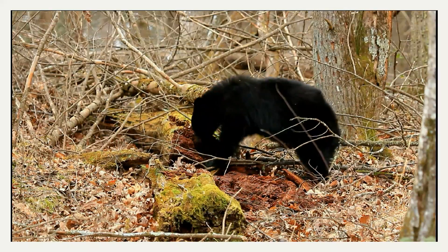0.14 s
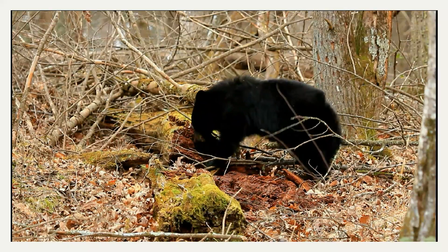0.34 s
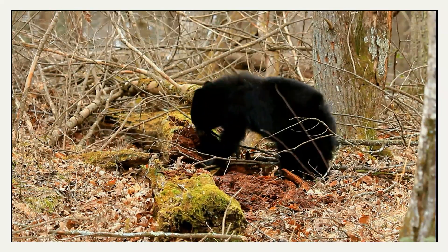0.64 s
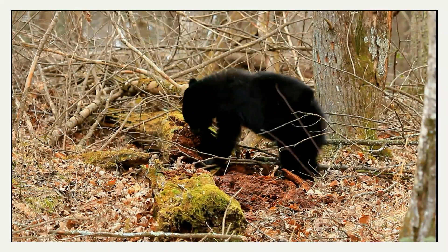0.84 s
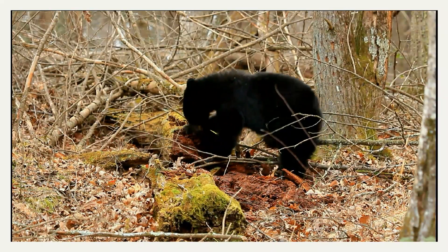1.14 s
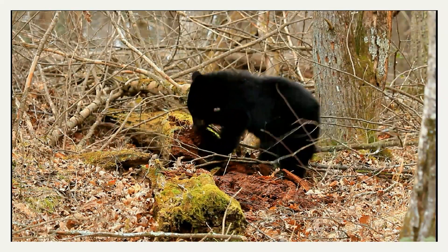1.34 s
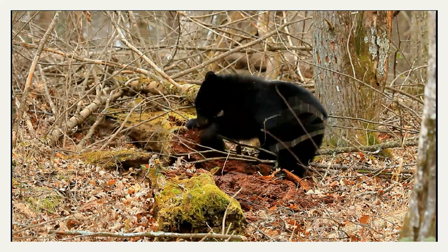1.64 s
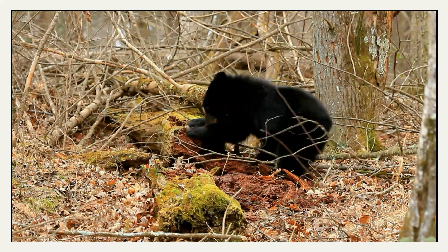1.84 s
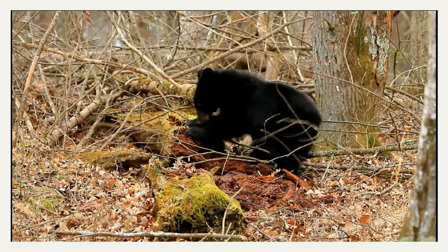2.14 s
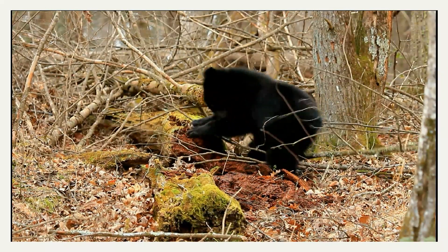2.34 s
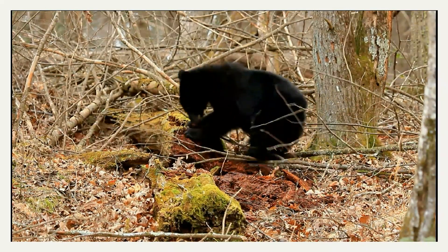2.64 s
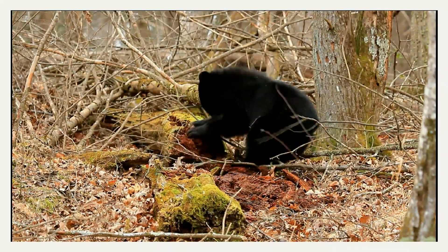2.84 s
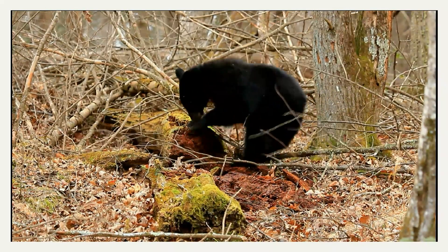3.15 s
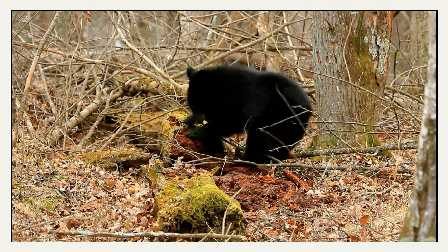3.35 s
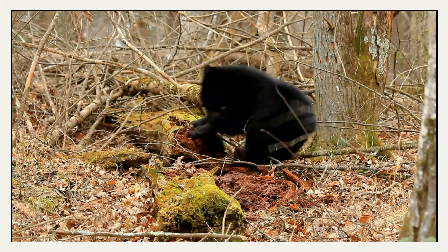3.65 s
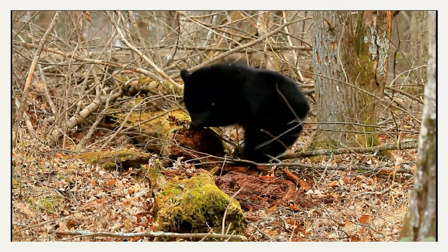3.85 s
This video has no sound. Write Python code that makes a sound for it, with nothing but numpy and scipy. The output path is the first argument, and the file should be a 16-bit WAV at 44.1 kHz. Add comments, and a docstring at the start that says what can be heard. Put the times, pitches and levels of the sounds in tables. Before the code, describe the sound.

A bear tears a rotten log: fibres rip from about 1.3 seconds, then three sharp snaps echo among the trees between 1.6 and 2 seconds. Faint twig ticks and dry leaves rustle over soft forest hiss throughout. A distant bird whistles at the start, at 2 and at 2.7 seconds. Low wind thumps hit the microphone from 1 second, becoming loud and rumbling between 3.2 and 3.8 seconds.

```python
"""A bear pulls a rotten log apart in a bare forest: fibres rip in swells of tiny clicks, splinters
snap (three loud, two faint) and ring, and both echo among the trunks. Twigs tick, dry leaves rustle.
A rising breeze rumbles, and its eddies thump on the microphone as dips of pressure.
A far bird whistles three arched notes over the soft hiss of the woods."""
import sys
import numpy as np
from scipy import signal
from scipy.fft import rfft, irfft
from scipy.io import wavfile

SR = 44100
rng = np.random.default_rng(int(sys.argv[2]) if len(sys.argv) > 2 else 0)


def unload_audio(sound):
    """Save the sound as a 16-bit wav file, at the path given as the first command line argument."""
    columns = np.transpose(np.atleast_2d(sound))
    # keep every value between -1 and 1, then stretch to whole-number steps
    steps = np.round(np.clip(columns, -1, 1) * 32767)
    wavfile.write(sys.argv[1], SR, steps.astype(np.int16))


N = 176400
T = np.arange(N) / SR

# splinter breaks: t/s, crack level/dB, crack decay/s, crack f/Hz, ring f/Hz, ring level/dB, ring t60/s
SNAPS = [(1.623, -40.5, 0.005, 7400, 1880, -39, .012), (1.6626, -25, 0.0029, 7700, 1516, -18, 0.0086),
         (1.808, -24, .0026, 8400, 1630, -18, 0.029), (1.9302, -23, 0.0019, 10760, 4060, -11, 0.002),
         (2.886, -47, 0.0021, 4970, 1620, -34.5, .009)]
# resonances of broken wood: f/Hz, width/Hz, gain/dB
WOOD_MODES = [(2120, 460, -0.5), (3380, 700, 2), (4750, 1040, 4.5), (8100, 1450, -6.5), (11000, 4600, -9),
              (14100, 1400, -11.5)]
# twig ticks: t/s, level/dB
TWIG_TICKS = [(.418, -56), (.602, -55), (0.727, -53), (1.115, -55), (1.481, -53), (2.019, -48), (2.25, -55),
              (3.012, -58), (3.039, -51), (3.218, -57)]
# swells of ripping fibres: t/s, level/dB, attack/s, release/s
RIPS = [(1.322, -46.5, .004, 0.014), (1.385, -43.5, 0.027, 0.026), (1.425, -42.5, .035, 0.051),
        (1.515, -44, 0.0044, 0.0098), (1.695, -49, 0.011, 0.022)]
# rip spectrum: f/Hz, gain/dB
RIP_SPECTRUM = [(880, -18), (1500, -10.5), (1610, -13), (2040, -11), (2490, -10), (3590, -7), (5070, -8),
                (13300, -30.5), (16000, -42)]
# stirring of the leaf litter: t/s, level/dB
LEAF_LEVELS = [(0, -65), (.1, -59.5), (.35, -62), (.66, -62), (.75, -56.5), (.87, -60), (1.0, -54.5),
               (1.24, -60), (1.6, -54), (2.15, -55.5), (2.35, -56.5), (2.49, -51.5), (2.74, -60),
               (3.02, -51.5), (3.13, -57), (3.3, -55.5), (3.52, -60), (3.7, -52.5), (4.0, -60.5)]
# leaf spectrum: f/Hz, gain/dB
LEAF_SPECTRUM = [(1200, -3), (2500, -2), (4500, -1), (7000, -7), (10000, -18), (16000, -28)]
# eddies on the microphone: t/s, level/dB, f/Hz, flutter re dip/dB
EDDIES = [(0.929, -29, 91, -38), (0.957, -32.5, 115.2, -32), (1.219, -26, 95, -30), (1.382, -22, 71.5, -33),
          (1.569, -30, 80, -28), (1.839, -27, 111, -32), (2.181, -28, 74.6, -28), (2.474, -16.5, 85, -25),
          (2.497, -18, 138, -40), (2.675, -29, 65, -25), (2.965, -28.5, 73, -32), (3.018, -17.5, 135, -14),
          (3.168, -15, 72.4, -25), (3.223, -20, 143, -30), (3.289, -7, 121, -14), (3.328, -4, 252, -13.5),
          (3.3688, -3, 156.4, -26), (3.44, -28.5, 89, -25), (3.533, -21.5, 128.7, -28),
          (3.599, -11, 96, -32), (3.6289, -5.5, 189, -14), (3.644, -6, 86, -35), (3.657, -8, 170, -13),
          (3.668, -15, 163, -19), (3.7126, -12, 109, -30), (3.746, -16, 200, -16), (3.933, -20, 144, -22),
          (3.992, -21, 125, -30)]
# breeze strength: t/s, level/dB
BREEZE_LEVELS = [(0, -52), (.7, -48.5), (1.2, -45.5), (1.9, -46), (2.4, -42), (2.8, -46.5), (3.1, -38),
                 (3.35, -29), (3.48, -36), (3.65, -31), (3.82, -37.5), (3.9, -31), (4.0, -29)]
# breeze spectrum: f/Hz, gain/dB
BREEZE_SPECTRUM = [(20, -19), (40, 2.5), (70, 2), (140, -6.5), (250, -20), (500, -26), (1000, -69)]
# bird notes: arch top t/s, direct level/dB, echo level/dB
WHISTLES = [(0, -50.5, -48), (2.06, -49, -46), (2.741, -42, -46)]
# hiss of the woods: f/Hz, gain/dB
HISS_SPECTRUM = [(15, -26), (25, 1), (145, -9.5), (185, -7.5), (223, -8), (405, -11.5), (476, -13.5),
                 (516, -13), (840, -16), (911, -15.5), (1480, -20.5), (9070, -40.5), (16000, -56.5)]


def rotten_log(echo_db=-7.5, directions=3):
    """Snaps, rips and their echoes; a break sounds a little different in each direction."""
    near, _ = splinters()
    rips = ripping()
    echoes = np.zeros(N)
    for _ in range(directions):
        _, outgoing = splinters()
        echoes += trunk_echoes(outgoing + rips, t60_s=1.0, build_s=0.0027)
    return near + rips + from_db(echo_db) * echoes / np.sqrt(directions)


def splinters(build_cycles=1.06, echo_1khz_db=-10, echo_db_per_octave=5):
    """A break cracks and the freed piece rings; twigs only tick. Returns near and outgoing sound."""
    near, outgoing = np.zeros(N), np.zeros(N)
    t = T[:SR // 10]
    for at_s, crack_db, decay_s, crack_hz, ring_hz, ring_db, t60_s in SNAPS:
        envelope = (1 - np.exp(-t * ring_hz / build_cycles)) * from_db(-60 * t / t60_s)
        ring = from_db(ring_db) * envelope / envelope.max() * np.sin(2 * np.pi * ring_hz * t)
        snap = from_db(crack_db) * crack(decay_s, crack_hz)
        carry_db = echo_1khz_db + echo_db_per_octave * np.log2(ring_hz / 1000)  # low rings carry less
        add(near, at_s, snap + ring)
        add(outgoing, at_s, snap + ring * from_db(carry_db))
    for at_s, db in TWIG_TICKS:
        add(near, at_s, from_db(db) * crack(decay_s=0.0061, sharp_hz=6900))
    return near, outgoing


def crack(decay_s, sharp_hz, sharp_db=-3):
    """A quick run of fractures excites the wood's modes and one resonance of its own."""
    t = T[:SR // 10]
    fractures = rng.standard_normal(len(t)) * np.exp(-t / decay_s)
    wood = sum((-1) ** k * from_db(db) * resonance(fractures, hz, width_hz)
               for k, (hz, width_hz, db) in enumerate(WOOD_MODES))
    sharp = from_db(sharp_db) * resonance(fractures, sharp_hz, width_hz=1840)
    return unit_rms(wood - sharp, decay_s)


def ripping():
    """Soft wood gives way in swells of tiny fibre breaks."""
    power = np.zeros(N)
    for at_s, db, attack_s, release_s in RIPS:
        swell = np.exp(-np.maximum((at_s - T) / attack_s, (T - at_s) / release_s))
        power += (from_db(db) * swell) ** 2
    return np.sqrt(power) * colour(clicks(per_s=3000, spread_db=2.5), RIP_SPECTRUM)


def leaves():
    """Dry litter crackles under the paws."""
    return gain_curve(LEAF_LEVELS) * colour(clicks(per_s=4000, spread_db=1.5), LEAF_SPECTRUM)


def wind(wake_db=-13, wake_ratio=0.86, flutter_ratio=2.4):
    """Each eddy is a pressure dip with a fluttering core and a longer wake, over a low rumble."""
    out = gain_curve(BREEZE_LEVELS) * colour(rng.standard_normal(N), BREEZE_SPECTRUM)
    t = T[:SR // 5] - T[SR // 10]  # centred on the eddy
    for at_s, db, hz, flutter_db in EDDIES:
        phase_squared = (np.pi * hz * t) ** 2
        dip = (2 * phase_squared - 1) * np.exp(-phase_squared)
        wake = from_db(wake_db) * swirl(t, hz * wake_ratio, length_s=0.012)
        flutter = from_db(flutter_db) * swirl(t, hz * flutter_ratio, length_s=0.003)
        add(out, at_s + t[0], from_db(db) * (dip + wake + flutter))
    return out


def swirl(t, hz, length_s):
    """A brief patch of turbulence around one pitch."""
    band = signal.butter(3, [hz / 2, 1.2 * hz], "band", fs=SR, output="sos")
    turbulence = signal.sosfilt(band, rng.standard_normal(len(t)))
    return unit_rms(turbulence / np.cosh(t / length_s), length_s)


def bird(top_hz=1469, drop_hz=329, drop_s=0.041, arch_power=2.8, fade_db=2.5):
    """A pure note rises, holds and falls, weaker at its low ends, then lingers among the trees."""
    direct, outgoing = np.zeros(N), np.zeros(N)
    for top_s, direct_db, echo_db in WHISTLES:
        from_top = np.minimum(abs(T - top_s) / drop_s, 2)
        drop = from_top ** arch_power
        hz = top_hz - drop_hz * drop
        envelope = (from_top < 2) * from_db(-fade_db * np.maximum(drop, drop ** 2))
        note = envelope * np.sin(2 * np.pi * np.cumsum(hz) / SR)
        direct += from_db(direct_db) * note
        outgoing += from_db(echo_db) * note
    return direct + trunk_echoes(outgoing, t60_s=1.5, build_s=0.0046)


def trunk_echoes(x, t60_s, build_s, treble_t60_s=0.45, split_hz=3000):
    """Trunks scatter the sound; the treble dies sooner."""
    t = T[:SR]
    scatter = rng.standard_normal(SR) * rng.exponential(1, SR) * (1 - np.exp(-t / build_s))
    low = signal.sosfilt(signal.butter(1, split_hz, fs=SR, output="sos"), scatter)
    tail = low * from_db(-60 * t / t60_s) + (scatter - low) * from_db(-60 * t / treble_t60_s)
    return signal.fftconvolve(x, tail / np.sqrt(np.sum(tail ** 2)))[:N]


def woods_hiss(level_db=-44.5):
    """Soft, steady noise of the woods."""
    return from_db(level_db) * colour(rng.standard_normal(N), HISS_SPECTRUM)


def from_db(db):
    """Decibels to gain."""
    return 10 ** (np.asarray(db) / 20)


def unit_rms(x, length_s):
    """Scale to the energy of rms 1 held for length_s."""
    return x * np.sqrt(length_s * SR / np.sum(x ** 2))


def gain_curve(points):
    """Gain over time from t/s, level/dB points."""
    return from_db(np.interp(T, *np.transpose(points)))


def colour(x, spectrum):
    """Shape x by f/Hz, gain/dB points, rolling off below the first; rms 1."""
    hz, db = np.transpose(spectrum)
    bins_hz = np.maximum(np.fft.rfftfreq(N, 1 / SR), 1)
    rolloff = np.minimum(bins_hz / hz[0], 1) ** 2
    gain = from_db(np.interp(np.log(bins_hz), np.log(hz), db))
    return unit_rms(irfft(rfft(x) * rolloff * gain, N), N / SR)


def resonance(x, hz, width_hz):
    """Two-pole band-pass, peak gain 1."""
    r = np.exp(-np.pi * width_hz / SR)
    feedforward = np.array([1, 0, -1]) * (1 - r * r) / 2
    feedback = [1, -2 * r * np.cos(2 * np.pi * hz / SR), r * r]
    return signal.lfilter(feedforward, feedback, x + 1e-18)


def clicks(per_s, spread_db):
    """Random impulses of uneven size."""
    impulses = (rng.random(N) < per_s / SR) * rng.choice([-1, 1], N)
    return impulses * from_db(spread_db * np.minimum(rng.exponential(1, N), 5))


def add(out, at_s, x):
    """Mix x into out from at_s on."""
    start = int(np.clip(at_s * SR, 0, N - 1))
    out[start:start + len(x)] += x[:N - start]


def scene():
    """The log amid wind, leaves, bird and hiss; mono."""
    hiss = woods_hiss()
    surroundings = wind() + hiss + leaves() + bird()
    return (rotten_log() + surroundings)[None]


def record(dry):
    """Steep low-pass."""
    cutoff_hz = 16000
    return signal.sosfilt(signal.ellip(10, .1, 80, cutoff_hz, fs=SR, output="sos"), dry)


dry = scene()
out = record(dry)
unload_audio(out)
```